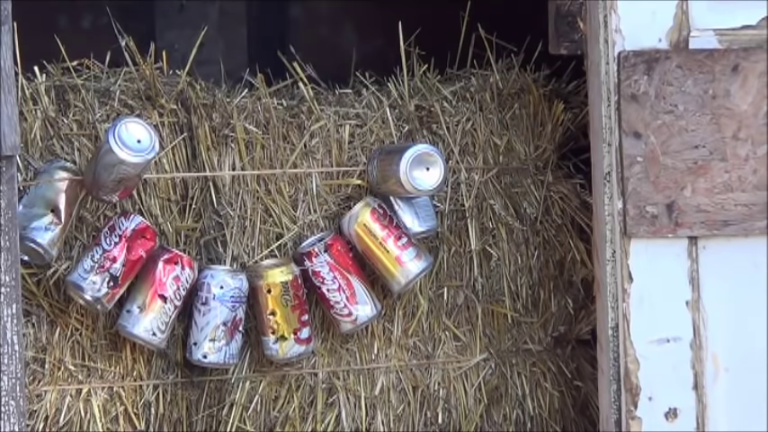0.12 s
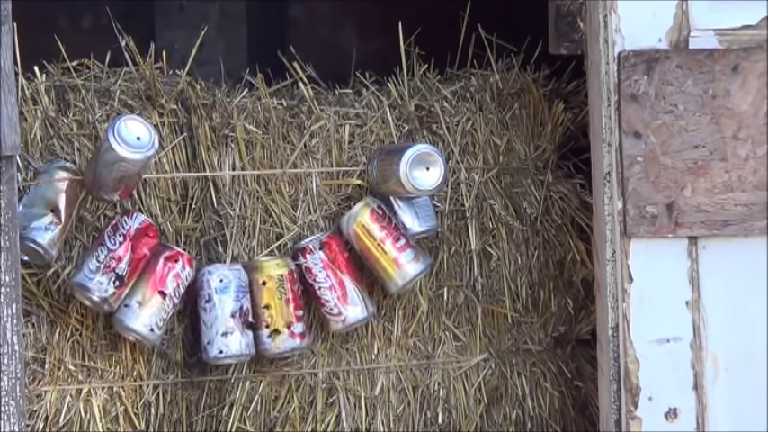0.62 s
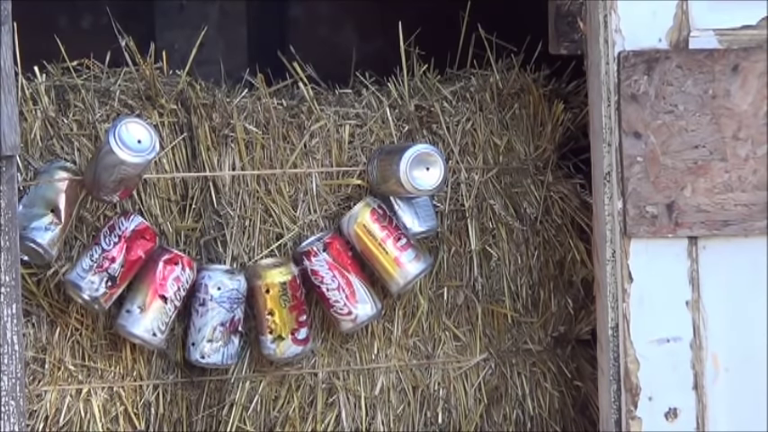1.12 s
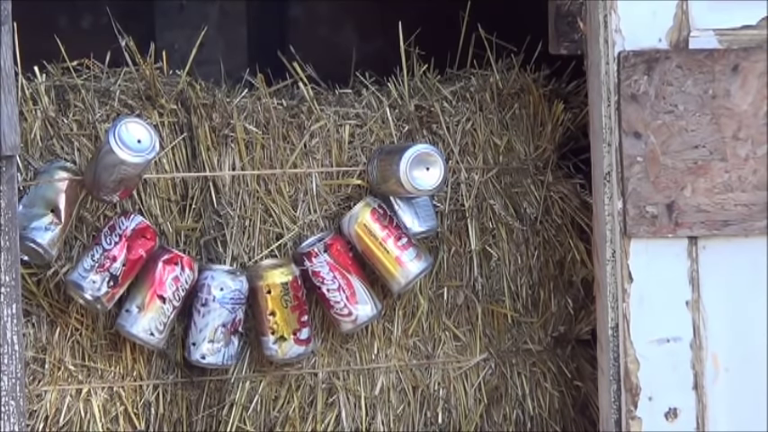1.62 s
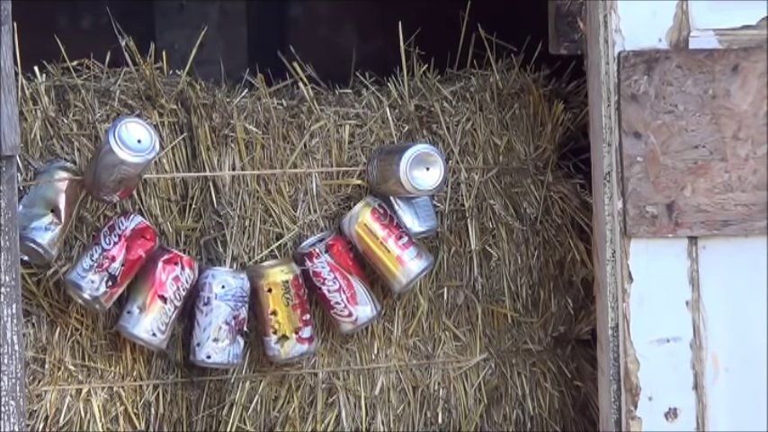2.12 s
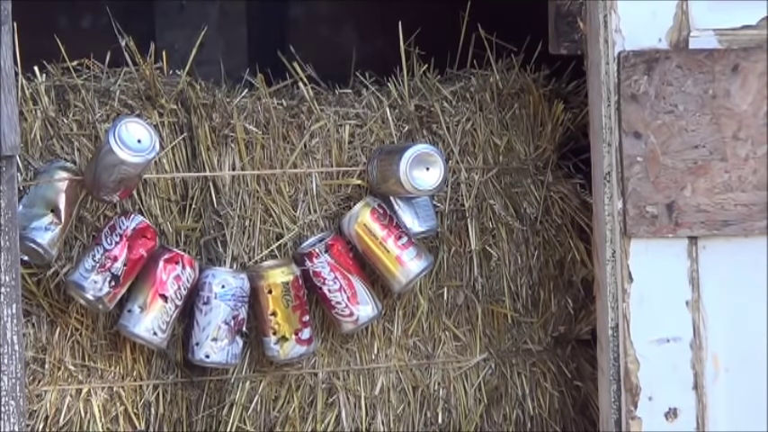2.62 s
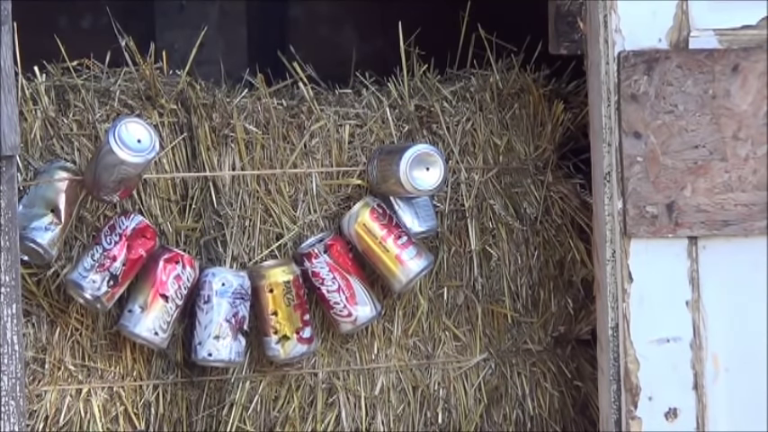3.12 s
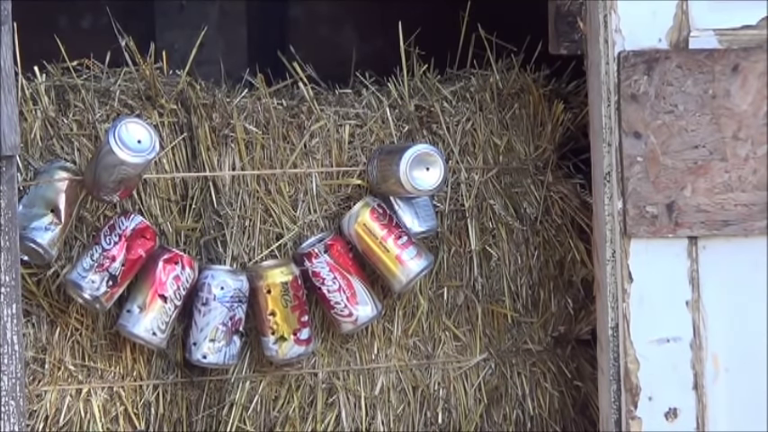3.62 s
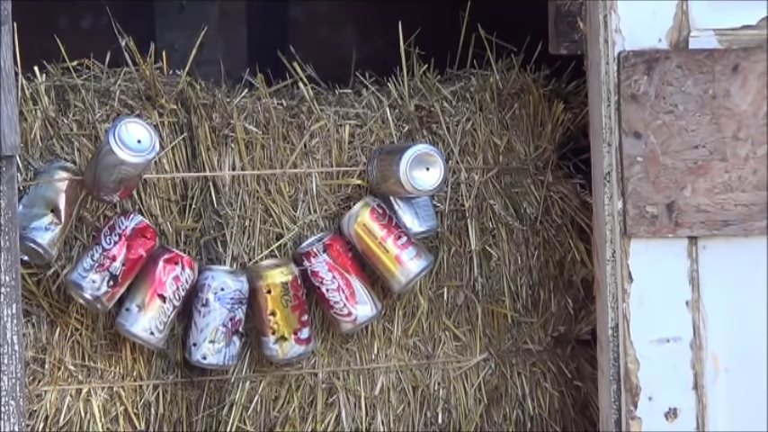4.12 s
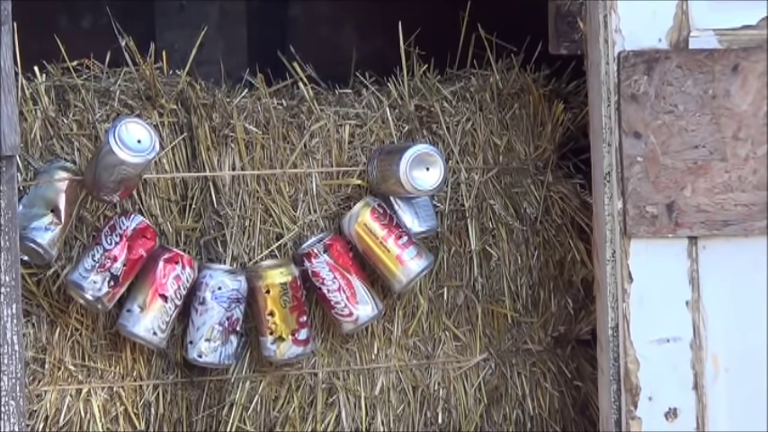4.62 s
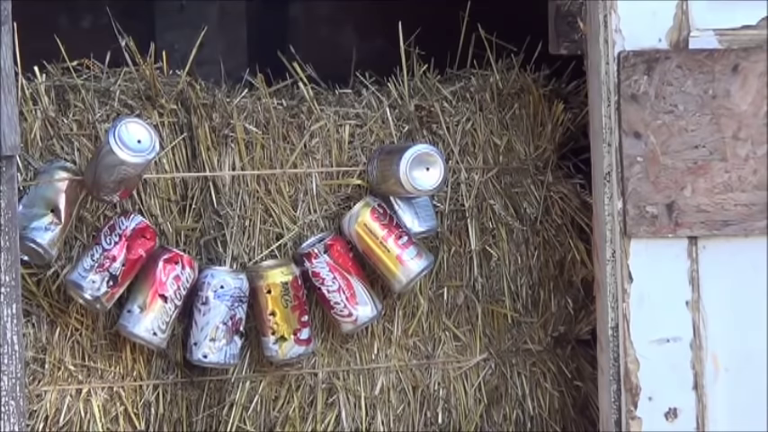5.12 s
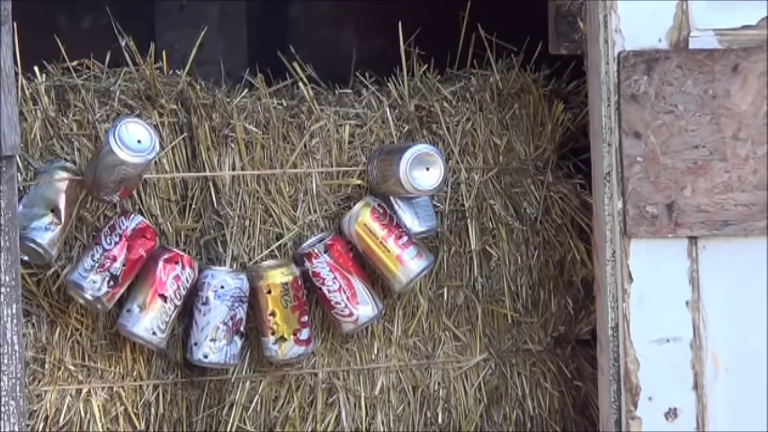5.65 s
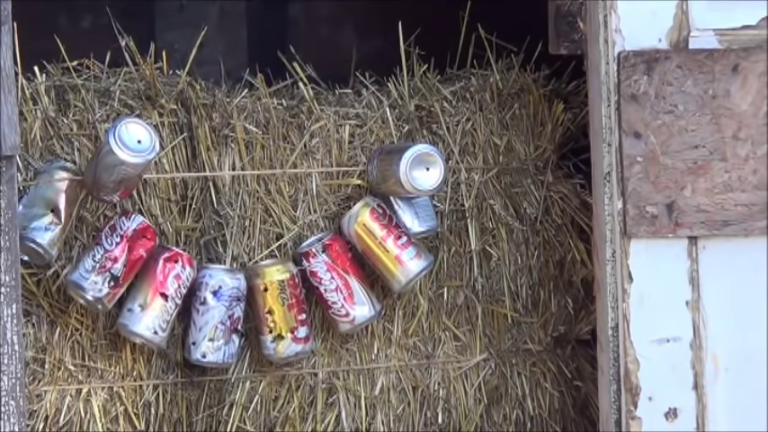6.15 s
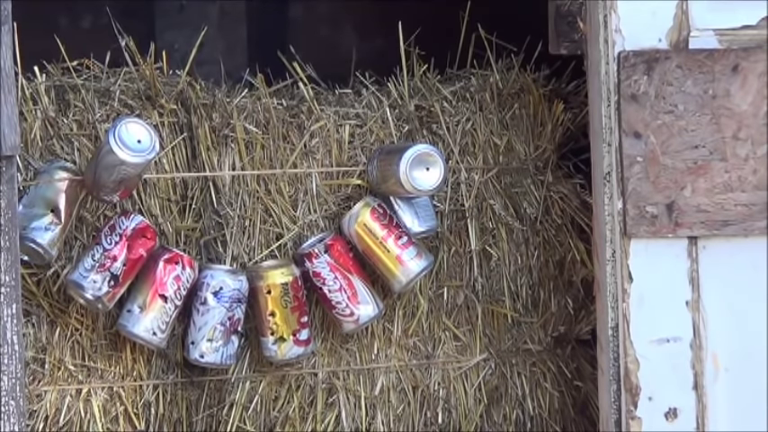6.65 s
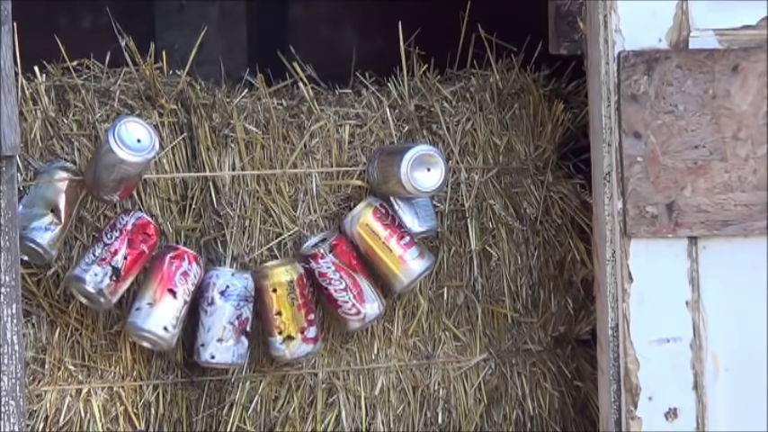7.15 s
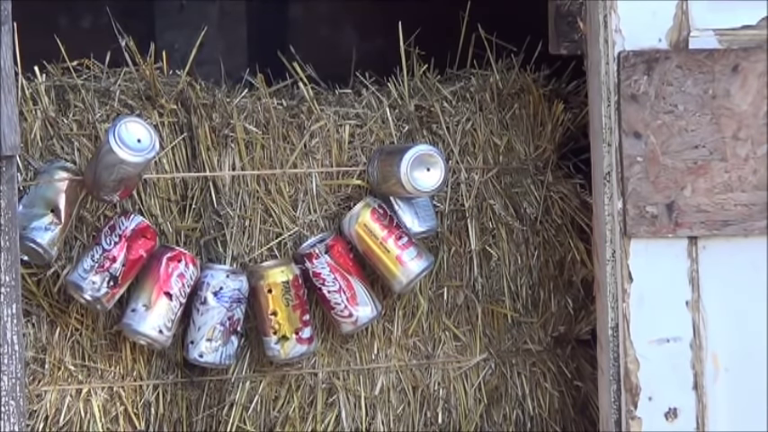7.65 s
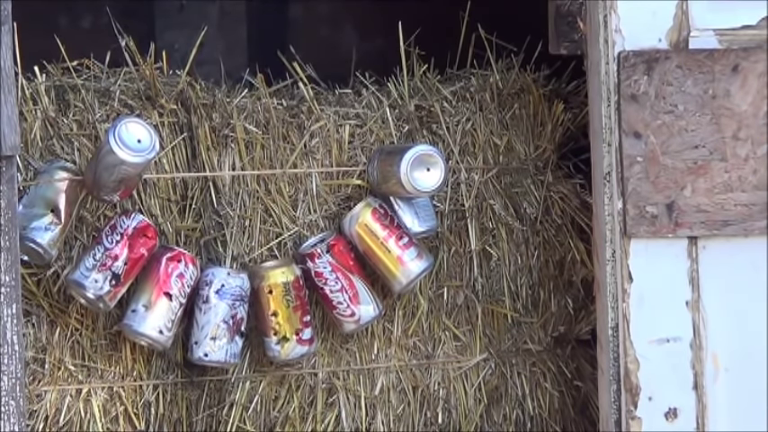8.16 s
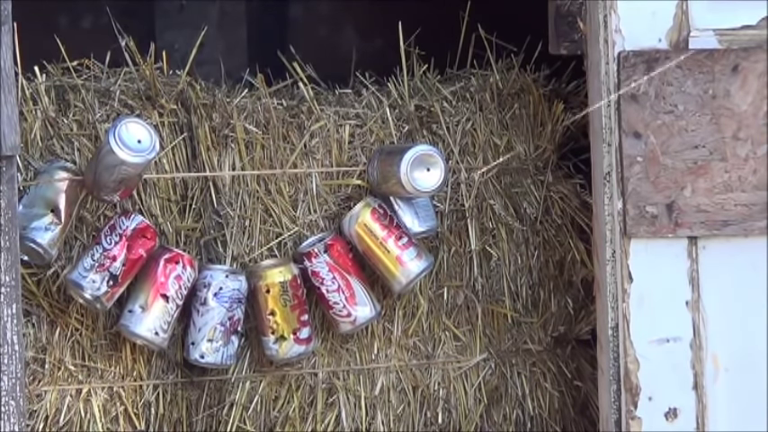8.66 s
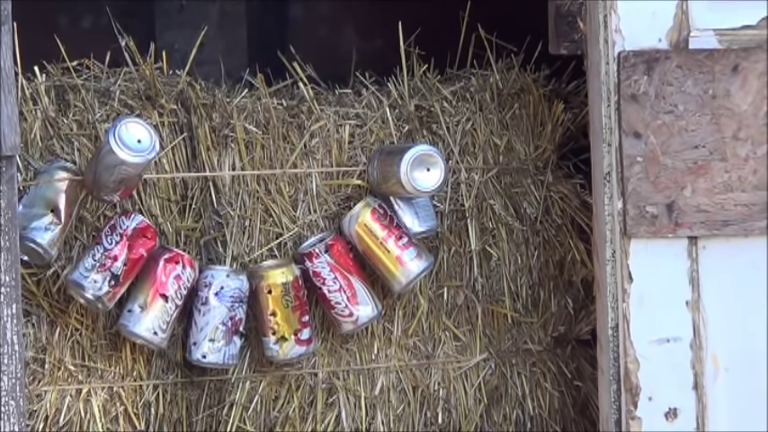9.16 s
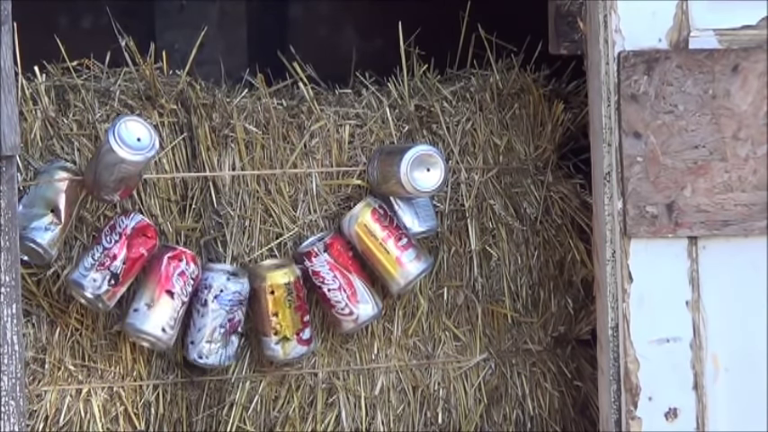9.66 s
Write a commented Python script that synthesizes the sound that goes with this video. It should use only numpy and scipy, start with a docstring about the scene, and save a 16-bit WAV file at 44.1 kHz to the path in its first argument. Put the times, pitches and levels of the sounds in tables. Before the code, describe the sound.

A stereo outdoor take near the shooter: loud metallic cocking clicks, sharp gas blasts, then tinny can impacts with brief hollow ringing and a slap echo. Ten shots come in steady rhythm, slightly faster toward the end. Tiny trigger squeaks appear in some gaps. Around seven seconds a can strike sets off a jangling cluster of knocks. Soft distant traffic, hiss, a very high steady whine and a faint engine lie underneath.

```python
"""A thin catch and a squeak, then a gas pistol in a yard is cocked and fired, ten times in all.
Each shot is hammer ticks and a gas blast of noise, then a pellet ringing a can or snapping into straw,
then the trigger resetting. Cans on a string knock together now and then, mostly after the seventh shot.
Behind it all lie traffic wash made of random spectra, a camera's whine of one steady tone and an idling
engine of tuned pulses that draws away; a gain control squeezes the loud sounds."""
import sys
import numpy as np
from scipy import signal
from scipy.fft import rfft, irfft
from scipy.io import wavfile
from scipy.ndimage import uniform_filter1d, minimum_filter1d

SR = 44100
rng = np.random.default_rng(int(sys.argv[2]) if len(sys.argv) > 2 else 0)


def materialize(psi):
    """Save the field psi as 16-bit PCM at rate SR to the path in sys.argv[1].

    A 1-D psi becomes a single channel; in a 2-D psi each row is a channel.
    """
    bounded = np.clip(np.atleast_2d(psi).T, -1, 1)
    quanta = np.round(bounded * 32767).astype(np.int16)
    wavfile.write(sys.argv[1], SR, quanta)


def nominal_scale(level):
    """Amplitude ratio for a level in decibels (scalar or array-like)."""
    x = np.asarray(level, float) / 20
    return 10 ** x


N = 430857  # length [samples]

# left-right likeness of blasts, hits and can knocks: (frequency [Hz], likeness [1 = same noise])
SHOT_SAME = [(60, 0.95), (240, 1), (950, 0.89), (3770, 0.61), (15000, 0.99)]
# colour of the dented can wall, also used for the blast's dull echoes: (frequency [Hz], relative level [dB])
BODY = [(180, -47), (300, -20.5), (1130, 0.5), (2600, -5), (3330, -5.5), (9230, -8.5), (12000, -10),
        (15600, -41)]
ECHO_MS = 99  # delay of the far wall's echo


def read(points, hz):
    """Reads a (Hz, value) table on a log-frequency axis."""
    f, value = np.transpose(points)
    return np.interp(np.log(hz + 1), np.log(f + 1), value)


def evened(x):
    """Scales to rms 1."""
    return x / np.sqrt(np.mean(x ** 2) + 1e-20)


def add(mix, s, sound):
    """Mixes a sound in at s seconds, cutting it off at the end of the mix."""
    part = mix[..., round(s * SR):][..., :sound.shape[-1]]
    part += sound[..., :part.shape[-1]]


def peaks(table, hz, floor_db):
    """Gain of a set of resonances (Hz, width Hz, dB) over a flat floor."""
    power = sum(nominal_scale(db) ** 2 / (1 + (2 * (hz - f) / width) ** 2) for f, width, db in table)
    return np.sqrt(nominal_scale(floor_db) ** 2 + power)


def bursts(count, size, colour, t60, same, grain_db, rise_ms, modal_db):
    """Stereo noise bursts, about rms 1 before rise and decay; each octave dies at its own speed, in uneven grains.
    A ragged spectrum, new for each burst, stands for the many close modes of thin metal."""
    hz, t = np.fft.rfftfreq(size, 1 / SR), np.arange(size) / SR
    a, b, grains, ragged = np.moveaxis(rng.standard_normal((count, size, 4)), 2, 0)
    ragged = evened(uniform_filter1d(ragged, size=size // 800))
    ragged = nominal_scale(modal_db * ragged[:, None, :len(hz)])
    lumps = nominal_scale(grain_db * evened(uniform_filter1d(grains ** 2 - 1, size=30)))  # separate reflections
    # the right side shares part of the left side's noise
    alike = np.clip(read(same, hz), -1, 1)
    left = rfft(a * lumps)
    right = alike * left + np.sqrt(1 - alike ** 2) * rfft(b * lumps)
    spectrum = np.stack([left, right], 1) * evened(colour(hz)) * evened(ragged)
    # octaves overlap, and swell apart as reflections arrive
    centres = np.geomspace(125, 16000, 8)
    octave = np.clip(np.log2(hz / 125 + 1e-9), 0, 7)
    swell = evened(uniform_filter1d(rng.standard_normal((count, len(centres), 1, size)), size=400))
    out = 0
    for k, centre in enumerate(centres):
        band = irfft(spectrum * np.maximum(1 - abs(octave - k), 0), size)
        out = out + band * nominal_scale(2 * swell[:, k] - 60 * t / read(t60, centre))
    return out * -np.expm1(-t * 1000 / rise_ms)


def ticks(count, top_hz, low_hz=1200):
    """Steel parts snapping: a fast tick and its faint tail off nearby walls."""
    # resonances of the pistol frame: (frequency [Hz], width [Hz], relative level [dB])
    metal = [(2130, 90, -5.5), (3420, 270, -1.5), (4280, 660, -5), (9030, 910, -2.5), (11800, 3400, -10.5)]
    # sideways lean: (frequency [Hz], left minus right [dB])
    metal_lean = [(60, -6), (380, 12), (2380, -8), (15000, 3.5)]
    # left-right likeness: (frequency [Hz], likeness [1 = same noise])
    metal_same = [(600, 0.91), (4000, 0.2), (15000, 0.76)]

    def colour(hz):
        lean = nominal_scale(np.array([[.5], [-.5]]) * read(metal_lean, hz))
        bass_cut = np.minimum(hz / low_hz, 1) ** 2
        return peaks(metal, hz, floor_db=-12) * bass_cut * lean / np.hypot(1, hz / top_hz)

    # decay times: (frequency [Hz], time to sink 60 dB [s])
    tick_t60 = [(1000, .03), (4000, .028), (15000, .014)]
    tail_t60 = [(1000, 0.05), (6000, 0.19), (15000, 0.095)]
    tick = bursts(count, 6144, colour, tick_t60, metal_same, grain_db=2, rise_ms=.15, modal_db=3)
    tail = bursts(count, 6144, colour, tail_t60, metal_same, grain_db=0.86, rise_ms=0.5, modal_db=3)
    return tick + nominal_scale(-16) * tail


def wash():
    """Distant traffic and microphone hiss: random short-time spectra with soft patches."""
    # colour: (frequency [Hz], relative level [dB])
    wash_colour = [(30, -39), (86, -8.5), (230, -9.5), (500, -1), (950, -0.5), (1500, -10.5), (4400, -18),
                   (16300, -23)]
    # left-right likeness: (frequency [Hz], likeness [1 = same noise])
    wash_same = [(60, 1.0), (240, 0.91), (950, 0.69), (3770, 0.063), (15000, 1)]
    frames, hz = N // 256 + 5, np.fft.rfftfreq(1024, 1 / SR)
    a, b, c, d, patches = rng.standard_normal((frames, 513, 5)).T
    patches = uniform_filter1d(patches, size=10, axis=0)  # over frequency
    patches = evened(uniform_filter1d(patches, size=12, axis=1))  # over time
    same = np.clip(read(wash_same, hz), -1, 1)[:, None]
    left = a + 1j * b
    right = same * left + np.sqrt(1 - same ** 2) * (c + 1j * d)
    spectra = np.array([left, right]) * nominal_scale(read(wash_colour, hz)[:, None] + 1.2 * patches)
    noise = signal.istft(spectra, nperseg=1024, noverlap=768)[1][:, :N]
    return nominal_scale(-47.5) * evened(noise)


def whine():
    """The camera's line whine: one steady, very high tone."""
    whine_hz, whine_db = 15735, -64
    return nominal_scale(whine_db) * np.sin(2 * np.pi * whine_hz * np.arange(N) / SR)


def engine():
    """Firing pulses ring the exhaust pipe; a few multiples of the idling speed hum on and waver."""
    # exhaust pulses drawing away: (time [s], level [dB])
    throb_fade = [(0, -53.5), (1.5, -57), (3.5, -59), (4.5, -69), (9.8, -80)]
    # pipe resonances: (frequency [Hz], width [Hz], relative level [dB])
    pipe = [(223.8, 9.4, 0), (339, 29, -3.5)]
    # hum: (multiple of the idling speed, level [dB])
    hum_orders = [(5, -67.5), (10, -66), (18, -61.5)]
    idle_hz, waver_db = 17.7, 3
    t = np.arange(N) / SR
    slow = rng.standard_normal((N, 1 + len(hum_orders)))
    slow = evened(uniform_filter1d(slow, size=20000, axis=0).T)
    turns = np.cumsum(idle_hz * (1 + 0.0027 * slow[0])) / SR  # the speed wanders a little
    throb = sum(peaks(pipe, k * idle_hz, floor_db=-30) ** 2 * np.cos(2 * np.pi * k * turns)
                for k in range(8, 25))
    hum = sum(nominal_scale(db + waver_db * w) * np.sin(2 * np.pi * round(k) * turns)
              for (k, db), w in zip(hum_orders, slow[1:]))
    return nominal_scale(np.interp(t, *np.transpose(throb_fade))) * evened(throb) + hum


def squeaks():
    """The moving trigger squeaks: a wavering, breathy whistle that slides up quickly, holds and droops."""
    # squeaks: (start [s], end [s], held pitch [Hz], level [dB])
    squeak_list = [(0.076, 0.112, 4800, -50.5), (1.392, 1.53, 6700, -58), (2.309, 2.401, 6300, -53),
                   (3.584, 3.665, 6100, -50), (6.508, 6.545, 5940, -53), (9.278, 9.354, 5950, -58)]
    out = np.zeros(N)
    for start, end, held_hz, db in squeak_list:
        u = np.linspace(0, 1, round((end - start) * SR))  # progress through the squeak
        wander = uniform_filter1d(rng.standard_normal((2, len(u))), size=150)
        waver, flutter = (evened(w) for w in wander)
        hz = held_hz * (1 - 0.17 * np.exp(-u / 0.12) - .06 * u ** 5) + 60 * waver
        whistle = np.sin(2 * np.pi * np.cumsum(hz) / SR)
        add(out, start, nominal_scale(db + 4.5 * flutter) * np.sin(np.pi * u) ** .9 * whistle)
    return out * nominal_scale(np.array([[-1.5], [1.5]]))  # a little to the right


def pistol():
    """Moving parts catch: each click is a bright tick and a duller one just after; some open with a clean snap."""
    # slack of the trigger taken up: times [s]
    take_up = [1.3174, 1.3808, 2.4149, 3.603, 4.7398, 5.7186, 6.7923, 8.553, 9.3753]
    # hammer cocked: times [s]
    cocked = [.2541, 1.5799, 2.5722, 3.843, 4.9672, 5.8616, 6.9604, 7.8308, 8.7151, 9.4679]
    # sear reset after the shot: times [s]
    reset = [.8764, 2.0045, 3.1347, 4.2782, 5.3005, 6.333, 7.271, 8.1662, 8.9952, 9.7533]
    # finger let off: times [s]
    let_off = [1.0455, 2.145, 3.301, 4.4177, 5.4654, 6.5002, 9.1561]
    # a lone thin catch: times [s]
    latch = [.0255]
    # each stage: (times [s], rough peak of the first tick [dB], of the second [dB])
    stages = [(take_up, -27, -28.5), (cocked, -6.5, -8.5), (reset, -8.5, -9), (let_off, -26, -26),
              (latch, -18, -17)]
    # clean snaps: (times [s], pitch [Hz], level [dB])
    snaps = [(reset, 3540, -13), (latch, 9600, -16.5)]
    second_ms = 7.5  # the sear's second catch
    snap_at_ms, snap_ms = 1.178, 0.45  # centre and half length of the snap

    out = np.zeros((2, N))
    clicks = [(s, db, second_db) for times, db, second_db in stages for s in times]
    bright = ticks(len(clicks), top_hz=14900)
    dull = ticks(len(clicks), top_hz=3800)
    for (s, db, second_db), first, second in zip(clicks, bright, dull):
        add(out, s, nominal_scale(db) * first / 3)  # a tick peaks about three times over its rms
        add(out, s + second_ms / 1000, nominal_scale(second_db) * second / 3)
    ms = np.arange(200) * 1000 / SR - snap_at_ms
    for times, snap_hz, db in snaps:
        snap = nominal_scale(db) * np.exp(-(ms / snap_ms) ** 2) * np.sin(2 * np.pi * snap_hz * ms / 1000)
        for s in times:
            add(out, s, snap)
    return out


def cans():
    """Knocks ring the stiff rims, the softer wall and, faintly but long, the low modes of the cans."""
    # cans knocking together on their string: (time [s], level [dB], wall against rim [dB])
    knocks = [(0.8974, -12.5, -28), (.953, -26, -7), (4.4561, -32.5, -4), (4.6941, -33, -7), (7.137, 2, -8),
              (7.2394, -2.5, 7.5), (7.3023, -9, -8), (7.345, -5, -6), (7.435, -0.5, 6.5), (7.4713, -17, -5),
              (7.529, -19.5, -4), (7.5547, -6, -0.5), (7.577, -9, -2), (7.651, -7.5, 2.5),
              (7.6889, -7, -11), (7.7762, -8.5, -8), (7.803, -17, -1), (7.872, -15.5, 2), (7.9044, -12, -1),
              (8.1645, -9, -4), (8.2487, -11.5, -6), (8.308, -14.5, -10)]
    # rim resonances: (frequency [Hz], width [Hz], relative level [dB])
    rim_notes = [(8600, 430, 8), (9770, 510, 3), (11300, 530, -1.5)]
    # low modes of a can: (frequency before detuning [Hz], relative level [dB])
    can_modes = [(1270, -4), (1357, -0.5), (1621, -3.5), (1725, -2), (1800, -4), (1930, -9), (2132, -4),
                 (2719, -6.5), (3390, -6)]
    low_t60, low_db, spread_db = .3, -33, 4  # each knock favours other low modes
    detune = .006  # each knock rings the low modes at slightly different pitches
    out, count, size = np.zeros((2, N)), len(knocks), 16384

    def rim_colour(hz):
        return peaks(rim_notes, hz, floor_db=-9.0) * np.minimum(hz / 4000, 1) ** 2

    def wall_colour(hz):
        return peaks([(5720, 700, 0)], hz, floor_db=-48) * np.minimum(hz / 3500, 1) ** 2

    # decay times: (frequency [Hz], time to sink 60 dB [s])
    rim_t60 = [(3000, 0.45), (8000, 0.13), (15000, 0.032)]
    wall_t60 = [(3000, 0.27), (6000, 0.055), (12000, 0.09)]
    rim = bursts(count, size, rim_colour, rim_t60, SHOT_SAME, grain_db=2, rise_ms=0.14, modal_db=4)
    wall = bursts(count, size, wall_colour, wall_t60, SHOT_SAME, grain_db=1.4, rise_ms=1.0, modal_db=3.3)
    t = np.arange(size) / SR
    mode_hz, mode_db = np.transpose(can_modes)
    strength, tune = rng.standard_normal((count, len(can_modes), 2)).T
    tuned_hz = mode_hz * (1 + detune * tune.T)
    modes = np.sin(2 * np.pi * tuned_hz[..., None] * t) * nominal_scale(low_db - 60 * t / low_t60)
    # add up the modes of each knock
    low = np.einsum("nm,nmt->nt", nominal_scale(mode_db + spread_db * strength.T), modes)
    contact = 1 + 1.5 * np.exp(-t / .003)  # the instant of contact is loudest
    for k, (s, db, wall_db) in enumerate(knocks):
        ringing = (rim[k] + nominal_scale(wall_db) * wall[k]) * contact / 6
        add(out, s, nominal_scale(db) * (ringing + nominal_scale(min(wall_db, 0)) * low[k]))
    return out


def hits():
    """Crack, body and ring of the struck can, and an echo off a far wall; a miss only snaps into the straw."""
    # pellets striking a can: (time [s], strike level [dB], ring of that can [Hz], ring level [dB])
    strikes = [(.6728, 1, 975, -13.5), (1.807, 2.5, 612, -16), (2.9352, 3, 938, -16), (4.0896, 2, 944, -14),
               (6.1855, -1, 1330, -15), (7.0982, 5.5, 944, -7.5), (7.9873, 1.5, 941, -5.5),
               (9.5962, 3, 802, -11)]
    # pellets snapping into the straw: times [s]
    misses = [5.1177, 8.8435]
    # colour of the crack: (frequency [Hz], relative level [dB])
    crack_colour = [(1180, -36.5), (2000, -10), (3460, -11), (10000, -2), (16000, -17)]
    # decay of the crack ahead of the extra fade: (frequency [Hz], time to sink 60 dB [s])
    crack_t60 = [(3000, 0.4), (10000, 0.19), (15000, 0.22)]
    # decay of the can wall ahead of the extra fade: (frequency [Hz], time to sink 60 dB [s])
    body_t60 = [(600, 0.38), (2000, 0.5), (12000, 0.39)]
    echo_t60 = [(1000, 0.011), (12000, 0.068)]
    body_db, echo_db = -9.5, -14  # can wall against the crack; echo against the strike
    ring_t60, ring_rise_s = 0.34, 0.0067
    miss_db, miss_ms = 0, .8  # level and decay
    open_sky_db = 150  # extra fade per s once the far wall has answered

    out, count, t = np.zeros((2, N)), len(strikes), np.arange(24576) / SR
    crack = bursts(count, len(t), lambda hz: nominal_scale(read(crack_colour, hz)), crack_t60, SHOT_SAME,
                   grain_db=0.21, rise_ms=0.16, modal_db=3.1)
    body = bursts(count, len(t), lambda hz: nominal_scale(read(BODY, hz)), body_t60, SHOT_SAME,
                  grain_db=3.8, rise_ms=2.7, modal_db=2.8)
    echo = bursts(count, 8192, lambda hz: nominal_scale(read(BODY, hz)), echo_t60, SHOT_SAME,
                  grain_db=0.74, rise_ms=0.95, modal_db=3.0)
    fade = nominal_scale(-open_sky_db * np.maximum(t - ECHO_MS / 1000, 0))
    for k, (s, strike_db, ring_hz, ring_db) in enumerate(strikes):
        ring = nominal_scale(ring_db - 60 * t / ring_t60) * np.sin(2 * np.pi * ring_hz * t)
        ring = ring * -np.expm1(-t / ring_rise_s)
        strike = nominal_scale(strike_db) * (crack[k] + nominal_scale(body_db) * body[k])
        add(out, s, strike * fade + ring)
        add(out, s + ECHO_MS / 1000, nominal_scale(strike_db + echo_db) * echo[k])
    for s, snap in zip(misses, crack):
        add(out, s, nominal_scale(miss_db) * snap * np.exp(-t * 1000 / miss_ms))
    return out


def shots():
    """Hammer and valve ticks, then the gas blast filling the yard, and its dull echoes off shed and far wall."""
    # hammer falls: times [s]
    falls = [.61, 1.7444, 2.8708, 4.0238, 5.0529, 6.121, 7.0329, 7.9216, 8.7753, 9.5289]
    # ticks of sear, hammer and muzzle: (time from the hammer fall [ms], level [dB])
    hammer = [(-5, -23), (-0.64, -16.5), (13.5, -24.5)]
    # colour of the blast: (frequency [Hz], relative level [dB])
    blast_colour = [(59, -64), (100, -30), (691, -3.5), (1420, -12), (1910, -6), (2630, -14), (10000, -5),
                    (13800, -11.5), (16000, -31)]
    # decay of the blast: (frequency [Hz], time to sink 60 dB [s])
    blast_t60 = [(200, 0.37), (600, 0.24), (1500, 0.54), (5000, 0.4), (12000, 0.27)]
    blast_ms, blast_db = 6.2, -3
    near_ms, near_db = 28, -8.5  # the blast thrown back by the near shed
    far_db = -19  # and by the far wall

    out, count = np.zeros((2, N)), len(falls)
    tick = ticks(count * len(hammer), top_hz=9700, low_hz=460).reshape(count, len(hammer), 2, -1)
    blast = bursts(count, 16384, lambda hz: nominal_scale(read(blast_colour, hz)), blast_t60, SHOT_SAME,
                   grain_db=2.4, rise_ms=20, modal_db=2.4)
    echoes = bursts(count, 4096, lambda hz: nominal_scale(read(BODY, hz)), [(1000, 0.11)], SHOT_SAME,
                    grain_db=1.5, rise_ms=1.5, modal_db=1.7)
    for s, clicks, gas, echo in zip(falls, tick, blast, echoes):
        for (ms, tick_db), sound in zip(hammer, clicks):
            add(out, s + ms / 1000, nominal_scale(tick_db) * sound)
        add(out, s + blast_ms / 1000, nominal_scale(blast_db) * gas)
        add(out, s + near_ms / 1000, nominal_scale(near_db) * echo)
        add(out, s + ECHO_MS / 1000, nominal_scale(far_db) * echo)
    return out


def scene():
    """All sources at the microphones."""
    background = wash() + whine() + engine()
    return background + squeaks() + pistol() + cans() + hits() + shots()


def held(level_db, db_per_s):
    """Follows a level up at once and lets it sink at a fixed rate."""
    fall = np.arange(N) * db_per_s / SR
    return np.maximum.accumulate(level_db + fall) - fall


def band_limit(x):
    """A steep low-pass at the top of the band."""
    return signal.sosfilt(signal.butter(12, 16520, fs=SR, output="sos"), x)


def record(dry):
    """A limiter that looks 3 ms ahead and lets go fast, over a gain control that recovers slowly; bass and top cut."""
    power_db = 10 * np.log10(abs(uniform_filter1d((dry ** 2).mean(0), size=88)) + 1e-12)
    over_db = np.maximum(power_db + 17, 0)  # how far the level stands above -17 dB
    ahead_db = -minimum_filter1d(-over_db, size=260)  # loudest level nearby, before or after
    quick_db = .6 * uniform_filter1d(held(ahead_db, db_per_s=140), size=130)
    slow_db = uniform_filter1d(held(np.minimum(over_db, 9), db_per_s=4.0), size=400, origin=190)
    held_down = np.clip(dry * nominal_scale(7.5 - quick_db - slow_db), -1, 1)
    bass_cut = signal.sosfilt(signal.butter(1, 60, "high", fs=SR, output="sos"), held_down)
    top_cut = signal.sosfilt(signal.cheby2(10, 50, 16700, fs=SR, output="sos"), bass_cut)
    return band_limit(top_cut)


dry = scene()
out = record(dry)
materialize(out)
```